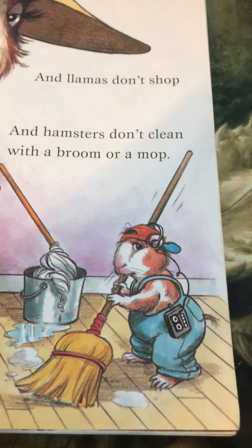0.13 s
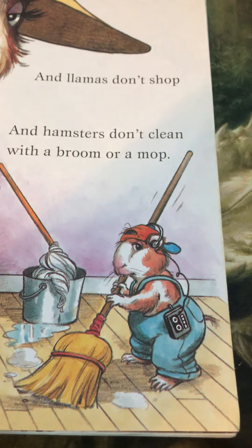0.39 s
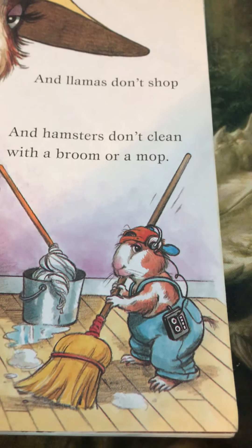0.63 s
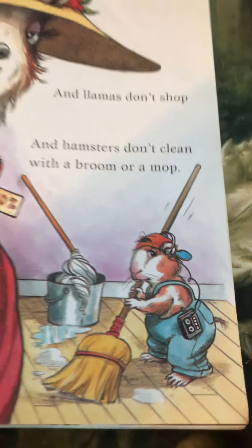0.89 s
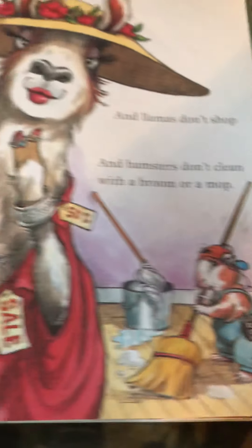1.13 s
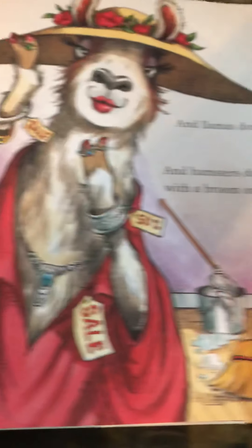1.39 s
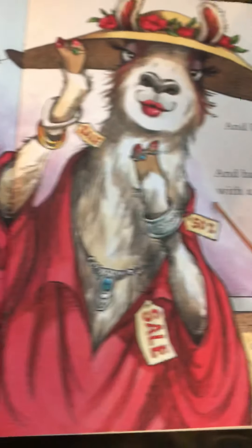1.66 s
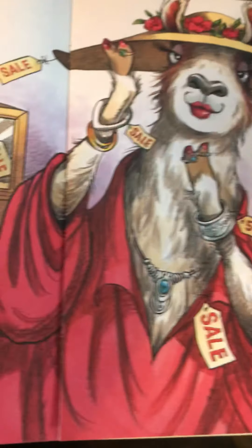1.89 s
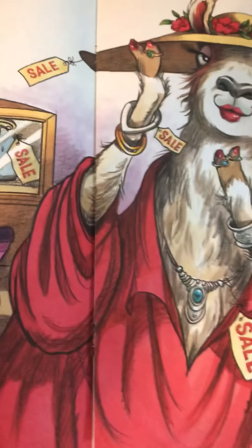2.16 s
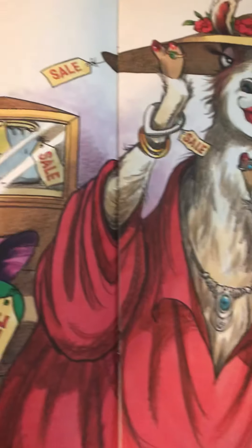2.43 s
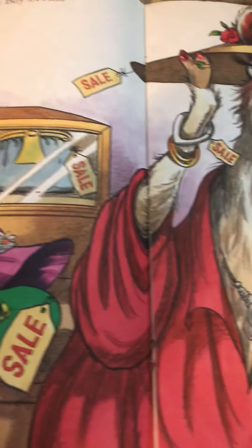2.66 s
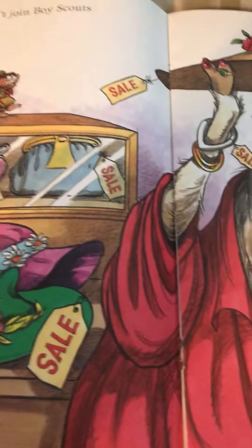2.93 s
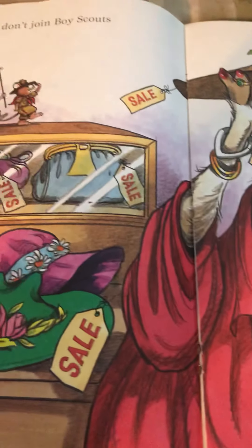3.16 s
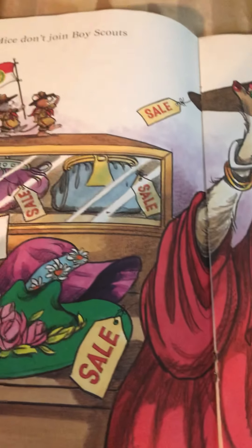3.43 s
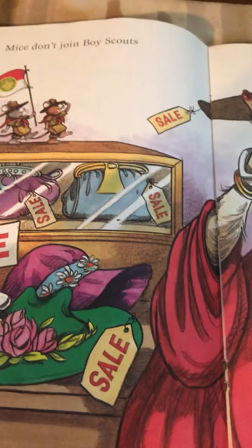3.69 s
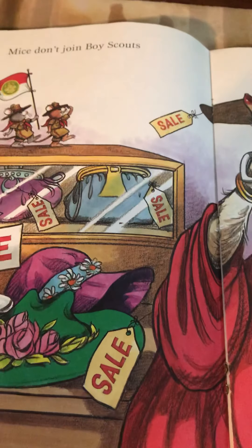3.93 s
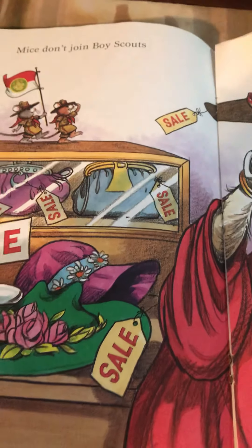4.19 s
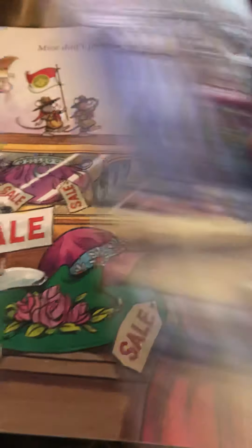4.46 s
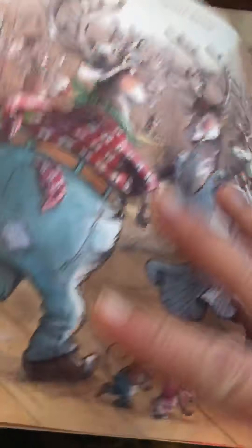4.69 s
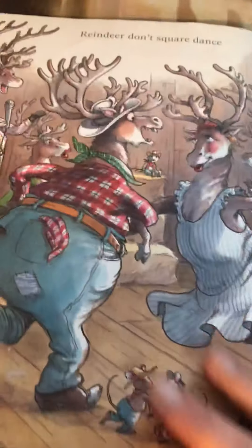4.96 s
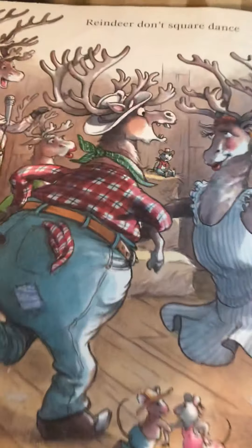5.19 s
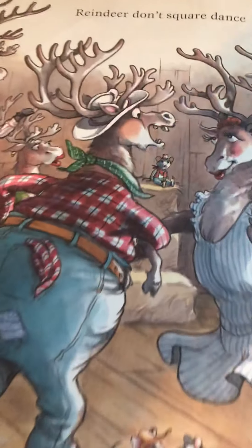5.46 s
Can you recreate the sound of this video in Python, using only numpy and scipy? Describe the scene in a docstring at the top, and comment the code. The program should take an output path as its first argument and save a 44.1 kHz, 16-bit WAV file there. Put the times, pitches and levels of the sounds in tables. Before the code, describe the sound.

Close phone microphone in a quiet room with low ventilation rumble and faint hiss. Tiny brushes and ticks on paper come first, then a brisk scrape with crisp clicks near two seconds and a thin fingertip slide. After a near-silent pause, a rub builds to one sharp snap as the page comes free, followed by a rustling swish, soft flaps, a smoothing stroke and faint taps.

```python
"""A quiet room, the microphone of a phone close to a picture book: a hand turns a glossy page.
Fingers and sheets slide in short strokes (shaped noise of micro-slips), creases tick (short noise bursts),
blows on the book ring its modes, a corner snaps free, and the page flaps and lands (puffs of resonant noise).
Under it lie a low ventilation rumble, wavering fan tones and the hiss of the microphone."""
import sys
import numpy as np
from scipy import signal
from scipy.fft import rfft, irfft
from scipy.io import wavfile
from scipy.ndimage import uniform_filter1d

SR = 44100
rng = np.random.default_rng(int(sys.argv[2]) if len(sys.argv) > 2 else 0)


def inscribe(sig):
    """Save sig as 16-bit PCM at rate SR to the path in sys.argv[1].

    A 1-D sig is mono; a 2-D sig holds one channel per row.
    Samples are clipped to [-1, 1] before scaling.
    """
    pcm = np.round(np.clip(np.atleast_2d(sig).T, -1, 1) * 32767)
    wavfile.write(sys.argv[1], SR, pcm.astype(np.int16))


def elevation(decibels):
    """Turn decibel levels (scalar or array-like) into linear amplitude ratios."""
    levels = np.asarray(decibels, float)
    return 10 ** (levels / 20)


N = 246519


def unit(x):
    """Scale to rms 1."""
    return x / np.sqrt(np.mean(x ** 2))


def log_frequencies(x):
    """Natural logarithm of the spectrum's frequencies, from 1 Hz up."""
    return np.log(np.maximum(np.arange(len(x) // 2 + 1) * SR / len(x), 1))


def colour(x, points):
    """Shape the spectrum by (f/Hz, level/dB) points joined on a log frequency axis."""
    hz, db = np.transpose(points)
    gain = elevation(np.interp(log_frequencies(x), np.log(hz), db))
    return irfft(rfft(x) * gain, len(x))


def resonate(x, hz, width):
    """Two-pole band-pass, gain 1 at the centre."""
    return signal.lfilter(*signal.iirpeak(hz, hz / max(width, 1), fs=SR), x)


# corners of the cross-fades between low, middle and high part: f/Hz
BAND_CORNERS = (1500, 4000, 5500, 11000)


def three_bands(x):
    """Low, middle and high part, cross-faded so that they sum to the whole."""
    f = log_frequencies(x)
    shares = ((1, 0, 0, 0), (0, 1, 1, 0), (0, 0, 0, 1))
    spectrum = rfft(x)
    return np.array([irfft(spectrum * np.interp(f, np.log(BAND_CORNERS), share), len(x)) for share in shares])


def walk(rate):
    """Random levels held 1 / rate s and slewed twice; spread near 1."""
    hold = int(SR / rate)
    steps = np.repeat(rng.standard_normal(N // hold + 1), hold)
    slewed = uniform_filter1d(uniform_filter1d(steps, hold), hold)
    return unit(slewed[:N])


def add(out, s, sound):
    """Mix a short sound in at time s."""
    i = int(s * SR)
    out[i:i + len(sound)] += sound[:N - i]


# the room's air and the microphone hiss, spectral shape: f/Hz, relative level per hertz/dB
ROOM_SHAPE = [(15, -65.5), (25, -31.5), (41, -5), (64, 0.5), (141, -11.5), (229, -13.5), (326, -20.5),
              (531, -30.5), (575, -26.5), (641, -28.5), (1070, -32.5), (1440, -34), (2160, -37.5),
              (2350, -36.5), (16000, -45.5)]
# wavering fan tones: f/Hz, width/Hz, level/dB
FAN_TONES = [(228.1, 2.9, -68.5), (298, 3.8, -70), (540, 8.5, -79), (772, 2.9, -83.5), (1470, 18, -82.5)]


def room(air_db=-55):
    """Steady rumble and hiss are one shaped noise; narrow bands of noise waver as fan tones."""
    air = elevation(air_db) * unit(colour(rng.standard_normal(N), ROOM_SHAPE))
    tones = sum(elevation(db) * unit(resonate(rng.standard_normal(N), hz, width)) for hz, width, db in FAN_TONES)
    return air + tones


# long movements over the paper, one list each: t/s, level of the hiss/dB,
# brightness (0 sheet on sheet, 1 fingertip on gloss)
STROKES = [
    [(1.575, -72, 0.53), (1.6, -68.5, 0.59), (1.65, -75.5, 0.39), (1.755, -74, 0.28), (1.836, -55, 0.62),
     (1.862, -49, 0.78), (1.886, -51.5, 0.67), (1.912, -44.5, 0.86), (1.925, -45, 0.18),
     (1.946, -58.5, 0.65), (1.986, -62.5, .7), (2.01, -85, .5)],
    [(2.378, -59, .9), (2.39, -58.5, 1.14), (2.415, -53.5, 1), (2.49, -57, 1.06), (2.56, -56, 1.12),
     (2.71, -66, 0.88), (2.74, -68, 0.98), (2.86, -72.5, .6), (2.905, -65, 0.66), (2.94, -69.5, 1.2),
     (2.985, -67.5, 0.91), (3.078, -73.5, .8), (3.1, -90, .8)],
    [(3.7, -55, 0.46), (3.708, -48.5, 0.55), (3.746, -51.5, 0.24), (3.755, -56.5, .3), (3.77, -42, 0.55),
     (3.795, -43, .4), (3.812, -36, 0.26), (3.826, -60.5, 0.15), (3.864, -64, .1)],
    [(3.868, -57, -0.21), (3.878, -47.5, -0.1), (3.9, -53, .05), (3.911, -47, 0.15), (3.922, -49.5, 0.16),
     (4.032, -50, -0.084), (4.08, -53, 0.22), (4.134, -47, 0.23), (4.212, -47.5, 0.3), (4.24, -50.5, -0.2),
     (4.258, -56, 0.36), (4.276, -50.5, 0.6), (4.358, -52.5, 0.36), (4.426, -56.5, 0.71),
     (4.486, -58.5, 0.54), (4.55, -55.5, 0.71), (4.616, -50, 1.0), (4.634, -54.5, 0.37), (4.64, -82, 0.17),
     (4.674, -70, .4)],
    [(4.846, -61, .4), (4.86, -61, .6), (4.899, -61.5, 0.32), (4.915, -56, 0.32), (5.0, -58.5, 0.86),
     (5.092, -54.5, 0.93), (5.158, -63, 1), (5.186, -78, 0.45), (5.21, -78, .5)],
]
# how the hand damps the sheet body, one value per long movement: body level/dB, lower is more damped
HELD = [-3, 1, 0.5, 1, -2.5]
# short brushes that swell and fade: middle t/s, length/s, peak level of the hiss/dB, brightness
BRUSHES = [(0.937, 0.12, -77.5, -0.53), (1.133, 0.15, -79, -0.26), (1.21, 0.059, -73.5, .4),
           (1.296, 0.24, -75, 0.55), (1.511, 0.074, -71.5, 0.76), (2.081, 0.027, -60.5, 1.3),
           (3.29, .07, -76, 0.72), (3.526, 0.048, -73, .9), (3.653, 0.021, -66, 0.36)]


def contact(lift_s=0.004, brush_held_db=1.2, body_db_per_bright=-10.5, grain_db=-9.5, grain_db_per_bright=12.5):
    """Gains of body, hiss and grain: a brighter contact moves the sheet less and scratches finer."""
    t = np.arange(N) / SR
    moves = []
    for rows, held_db in zip(STROKES, HELD):
        s, db, bright = np.transpose(rows)
        touch = np.clip(np.minimum(t - s[0], s[-1] - t) / lift_s + .5, 0, 1)
        gain = touch * elevation(np.interp(t, s, db))
        moves.append((gain, np.interp(t, s, bright), held_db))
    for s, length, db, bright in BRUSHES:
        phase = np.pi * np.clip((t - s) / length, -.5, .5)
        swell = np.sqrt(np.abs(np.cos(phase)))
        moves.append((elevation(db) * swell, bright, brush_held_db))
    power = 0
    for gain, bright, held_db in moves:
        # body (below about 2.5 kHz) and grain (above about 8 kHz) against the hiss between them
        body = elevation(held_db + body_db_per_bright * bright)
        grain = elevation(grain_db + grain_db_per_bright * bright)
        power = power + np.array([gain * body, gain, gain * grain]) ** 2
    return np.sqrt(power)


# colour of paper rubbed up close, also under the ticks: f/Hz, relative level per hertz/dB
SLIDE = [(240, -20), (400, -13), (598, -9.5), (826, -5.5), (1060, -4), (1530, -5), (2120, -4.5), (2590, -3),
         (4950, -3), (6540, -3), (10400, -1.5), (15300, -3), (16000, -29)]
# resonances of the rubbed sheet: f/Hz, width/Hz, middle level against the bare slips/dB
SHEET = [(613, 45, -7), (980, 110, -11), (2140, 390, -11), (2970, 870, -19), (4420, 280, -3.5),
         (6240, 3100, -5.5), (8840, 760, -19), (11500, 380, -12), (13200, 870, -21)]
# colour of cracking paper, also under the blows: f/Hz, relative level per hertz/dB
CRACK = [(300, -12), (1500, -0.5), (6000, -7.5), (9000, -13), (16000, -33)]


def sliding(catch_db=1.0, grip_db=0.83, bend_db=4.0, crackle_db=-6, crackles_per_s=160, spread_db=4.5,
            crackle_t60_s=0.0073):
    """Dense micro-slips of uneven size; grip wavers, and each sheet resonance comes and goes as the page bends."""
    unevenness_db = catch_db * walk(900) + grip_db * walk(80)
    slips = rng.standard_normal(N) * elevation(unevenness_db)
    ringing = sum(elevation(db + bend_db * walk(12)) * resonate(slips, hz, width) for hz, width, db in SHEET)
    low, mid, high = (unit(band) for band in three_bands(colour(slips + ringing, SLIDE)))
    body_gain, hiss_gain, grain_gain = contact()
    # where the sheet itself moves, small creases pop at random
    pops = (rng.random(N) < crackles_per_s / SR) * elevation(spread_db * rng.exponential(size=N))
    fading = signal.lfilter([1], [1, -elevation(-60 / (crackle_t60_s * SR))], pops)
    bursts = fading * rng.standard_normal(N)
    crackle = elevation(crackle_db) * unit(colour(bursts, CRACK))
    return body_gain * (low + crackle) + hiss_gain * mid + grain_gain * high


# creases ticking: t/s, relative level/dB, pitch f/Hz, narrowness (0-1)
TICKS = [(0.9497, -47.5, 3030, .7), (1.0636, -32, 4940, 0.7), (1.2202, -40.5, 3800, 0.33),
         (1.2391, -39, 4770, 0.24), (1.4555, -42, 2500, 0.15), (1.657, -48, 5000, .3),
         (1.715, -51, 3000, .3), (1.8637, -19.5, 2960, .8), (1.9186, -15, 4400, 0.33),
         (2.7174, -46, 5770, .25), (3.021, -45, 4820, .55), (3.032, -44.5, 5390, .55),
         (3.2535, -49.5, 3340, .3), (3.2718, -46, 4420, .1), (3.279, -42, 4270, 0),
         (3.2869, -36.5, 5820, 0.32), (3.3037, -48, 4490, .15), (3.327, -51, 4550, 0.06),
         (3.3543, -50.5, 6030, 0), (3.4067, -46.5, 6560, 0.6), (3.6444, -42.5, 3440, .85),
         (3.774, -30, 2090, .4), (3.803, -28, 2500, .3), (4.35, -34, 5260, 0.6), (4.81, -55, 2870, 0.4),
         (4.892, -40, 2620, 0.5), (4.908, -38, 2900, 0.4), (5.3168, -44, 2850, 0.7)]


def ticking(rise_s=0.00089, t60_s=0.012, ring_db=12.5, sharpness=14.0, treble_db_per_octave=8.0):
    """Each crease lets go in a short burst of cracks that favours its own pitch."""
    out, t = np.zeros(N), np.arange(SR // 20) / SR
    shape = np.minimum(t / rise_s, 1) * elevation(-60 * t / t60_s)
    # a fully narrow tick loses this much of its low, middle and high part
    narrow_db = np.array([-24, 0, -14])
    for s, db, hz, narrow in TICKS:
        bands = three_bands(colour(rng.standard_normal(len(t)), SLIDE))
        bands[1] += elevation(ring_db) * resonate(bands[1], hz, hz / sharpness)
        bands = bands / bands.std(axis=1, keepdims=True)
        # a higher tick carries more treble
        bands[2] *= elevation(treble_db_per_octave * np.log2(hz / 4500))
        burst = elevation(db + narrow * narrow_db) @ bands
        add(out, s, 0.44 * shape * burst)
    return out


# blows on the book: t/s, peak level of the ring/dB, contact/ms, thump against the other modes/dB,
# stiffness as pitch ratio
TAPS = [(0.9631, -40, 0.074, -17, 1.04), (1.005, -38.5, 0.032, 13, 0.98), (1.9302, -26, 0.24, -2, 1.01),
        (3.8679, -39.5, 0.25, 0, 1.23), (3.9015, -8.5, .035, -3, 1), (4.046, -42.5, 0.7, 1, 1.01),
        (4.2235, -29, 0.41, -8, 1), (4.499, -41, 0.11, -4, 1.06), (4.51, -42, 0.17, 3, 0.94),
        (4.679, -41, 0.32, -3, 0.89), (4.6922, -30, .17, -8, 0.98), (4.712, -41.5, 0.66, -6, .9),
        (4.769, -43, 0.81, 5, 0.76), (5.25, -42, 0.34, 12, 1.06), (5.288, -49, 0.36, -15, 1.08),
        (5.324, -44.5, 0.45, 10, 0.97), (5.532, -49, 0.2, -12, 0.94)]
# what the book rings with: f/Hz at stiffness 1, relative level/dB, t60/s
BOOK = [(100, -13, .13), (198, -9, .055), (600, -8, .045), (760, -9, .025), (980, -6, .04),
        (1125, -4, .035), (1800, -4, .025), (2075, -1, .024), (2450, -5, .022), (2925, -7, .032),
        (3465, -10, .02), (4370, -7, .017), (4875, -5, .017), (6370, -3, .017), (9100, -17, .02),
        (11500, -14, .01)]


def tapping(crack_t60_s=0.015, detune=0.0097, thump_hz=300, crack_db=-9, crack_db_per_ms=-26, dull_db_per_ms=-74):
    """A push rings the book's modes, duller for a longer contact; a crack of paper rides on it."""
    out, t = np.zeros(N), np.arange(SR // 5) / SR
    hz, mode_db, t60 = np.transpose(BOOK)[:, :, None]
    # deep modes start in alternate directions, the high ones leap off together
    start = np.where(hz < 1500, np.pi * np.arange(len(BOOK))[:, None], 1.2)
    for s, db, ms, thump_db, stiff in TAPS:
        pitch = stiff * hz * (1 + detune * rng.standard_normal(hz.shape))
        # the weight of the hand decides how much the deep cover modes move
        weight_db = mode_db + thump_db * (hz < thump_hz)
        modes = elevation(weight_db - 60 * t / t60) * np.sin(2 * np.pi * pitch * t + start)
        push = np.exp(-(t[:SR // 100] * 1000 / max(ms, .01) - 1) ** 2 * 2)
        ring = np.convolve(np.sum(modes, axis=0), push)[:len(t)]
        # a softer contact cracks less, and with less treble
        fade = elevation(crack_db + crack_db_per_ms * ms - 60 * t / crack_t60_s)
        crack = unit(colour(rng.standard_normal(len(t)), CRACK)) * fade
        crack = colour(crack, [(3000, 0), (9000, dull_db_per_ms * ms)])
        add(out, s, elevation(db) * (ring / np.abs(ring).max() + crack))
    return out


# the loose page flaps and settles on its air cushion: t/s, level that the fade starts from/dB, fade/(dB per s)
FLAPS = [(4.677, -46, 302), (4.692, -39, 700), (4.713, -53, 600), (4.758, -48, 448), (4.779, -48, 700),
         (5.251, -51.5, 250), (5.287, -51, 200), (5.318, -54, 142)]
# resonances of the gap under it: f/Hz, width of the first of two passes/Hz, relative level/dB
FLAP_MODES = [(740, 500, 2), (960, 290, 11), (1450, 160, -14)]


def flapping(flutter_db=3.0, rise_s=0.0046):
    """Air pumped from under the sheet in uneven puffs rings the gap dully."""
    t = np.arange(N) / SR
    puffs = rng.standard_normal(N) * elevation(flutter_db * walk(70))
    power = np.zeros(N)
    for s, db, fade in FLAPS:
        rise = np.clip((t - s) / rise_s, 0, 1)
        power += (rise * elevation(db - fade * np.maximum(t - s, 0))) ** 2
    gap = sum(elevation(db) * resonate(resonate(puffs, hz, width), hz, 2 * width) for hz, width, db in FLAP_MODES)
    return np.sqrt(power) * unit(gap)


# upper edge of the steady sound: f/Hz, gain/dB
TOP_EDGE = [(15900, -1), (16100, -34)]


def scene():
    """The book, with a short faint tail from the walls, over the room; one microphone feeds both channels."""
    air = room()
    steady = sliding() + flapping()
    blows = ticking() + tapping()
    t = np.arange(SR // 4) / SR
    wall_noise = colour(rng.standard_normal(len(t)), [(200, -2.0), (2000, 1.5), (16000, -7)])
    tail = wall_noise * elevation(-44 - 60 * t / 0.24)  # t60 0.24 s
    walls = signal.fftconvolve(steady + blows, tail)[:N]
    mono = blows + colour(steady + walls + air, TOP_EDGE)
    return np.array([mono, mono])


def top_cut(x):
    """Nothing passes above the cut-off."""
    return signal.sosfilt(signal.butter(12, 16990, fs=SR, output="sos"), x)


# phone housing around the microphone: f/Hz, width/Hz, level at the centre/dB
CASE_DIPS = [(4810, 630, -2.5), (7700, 380, -6), (10330, 460, -8)]


def record(dry):
    """The phone housing notches the treble in three places."""
    for hz, width, db in CASE_DIPS:
        dry = dry - (1 - elevation(db)) * resonate(dry, hz, width)
    return top_cut(dry)


dry = scene()
out = record(dry)
inscribe(out)
```